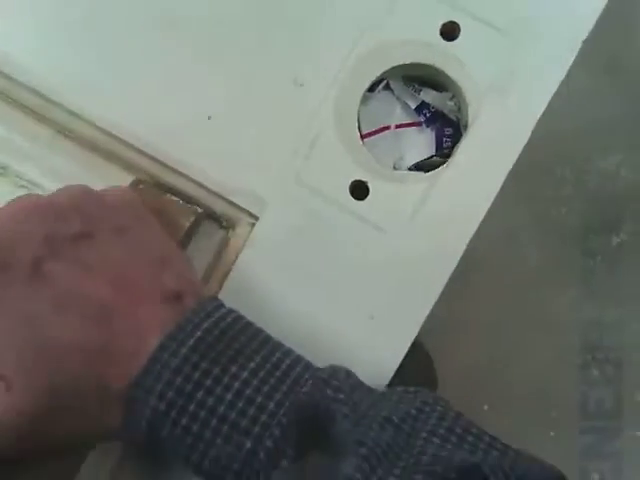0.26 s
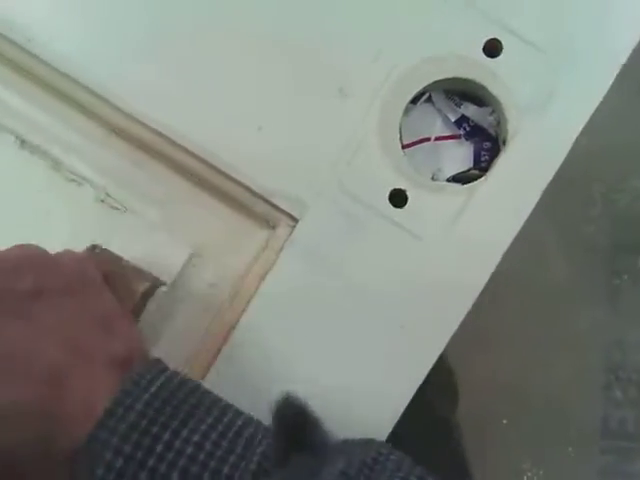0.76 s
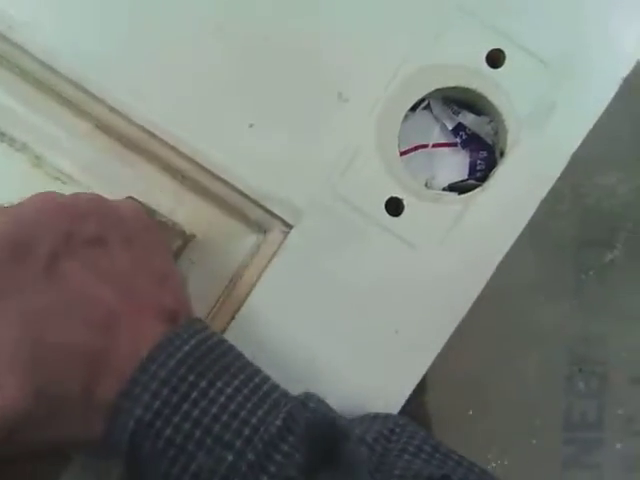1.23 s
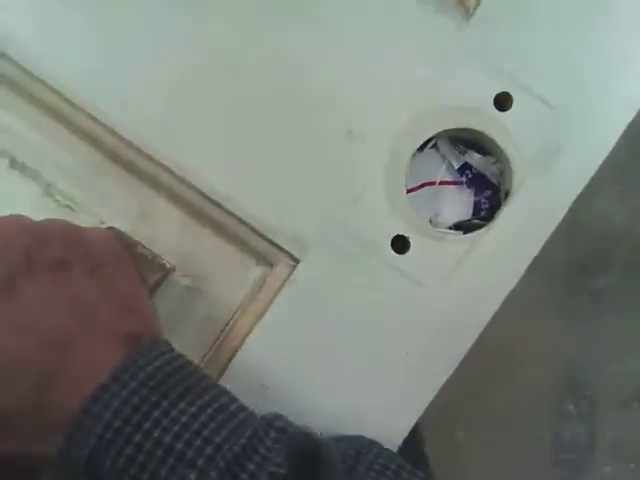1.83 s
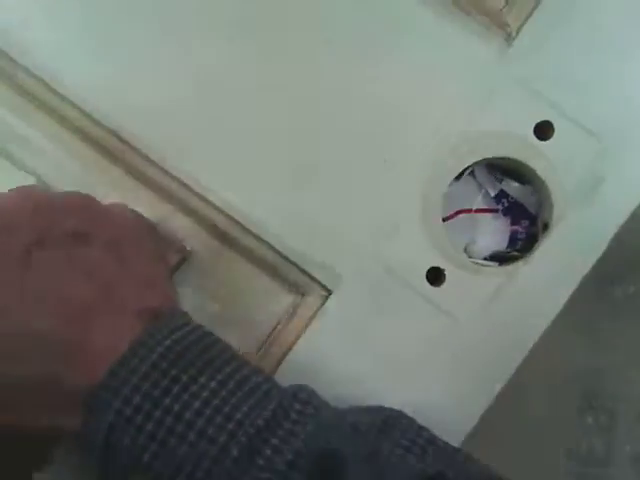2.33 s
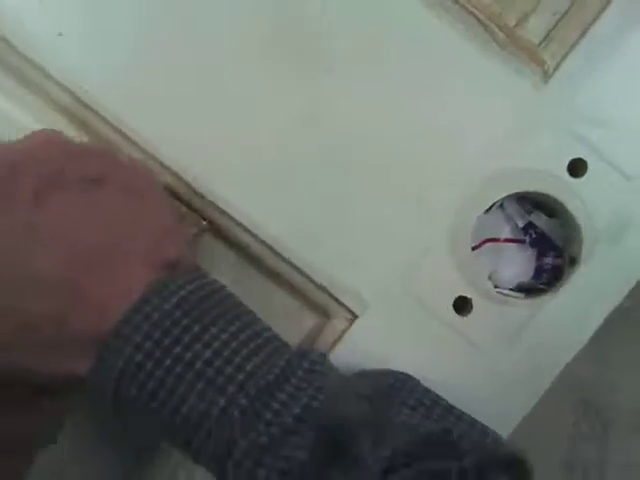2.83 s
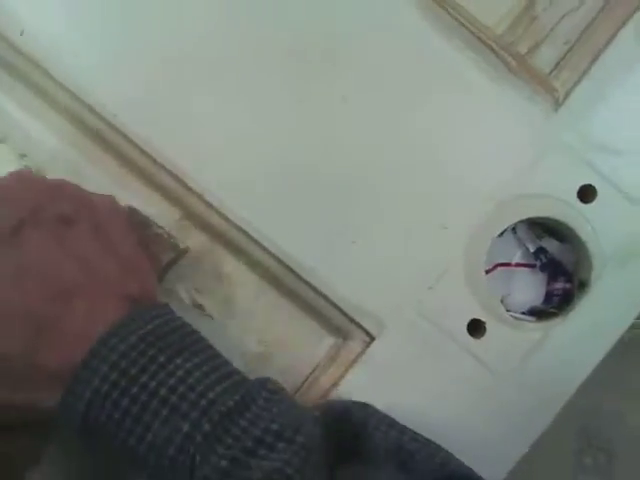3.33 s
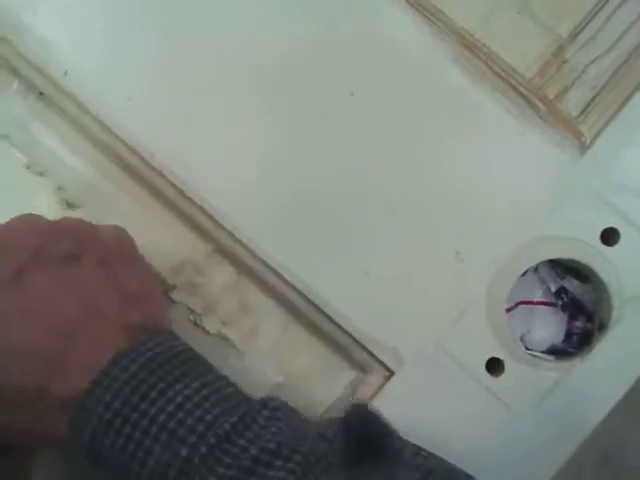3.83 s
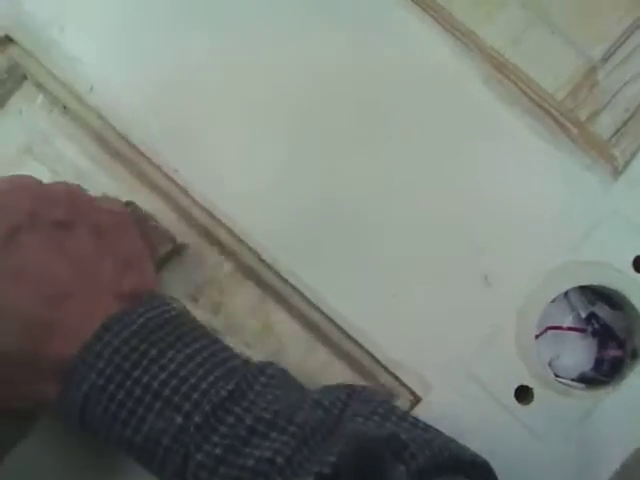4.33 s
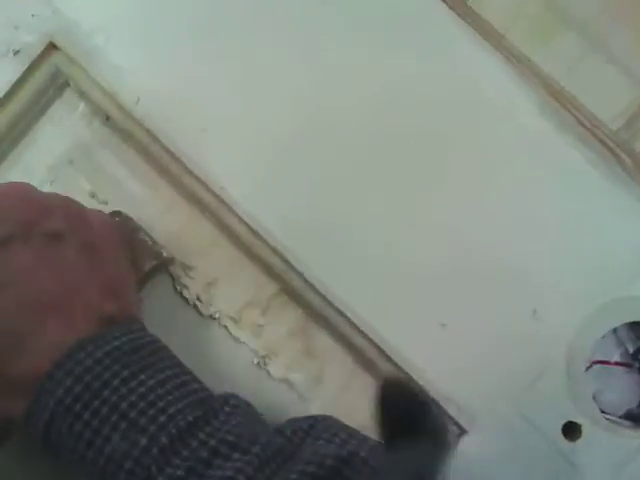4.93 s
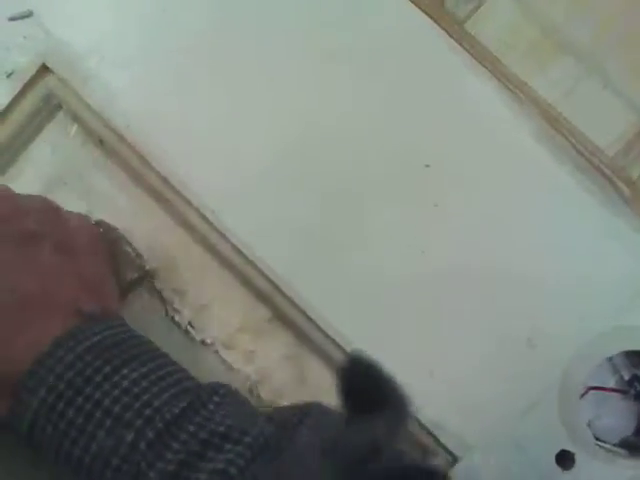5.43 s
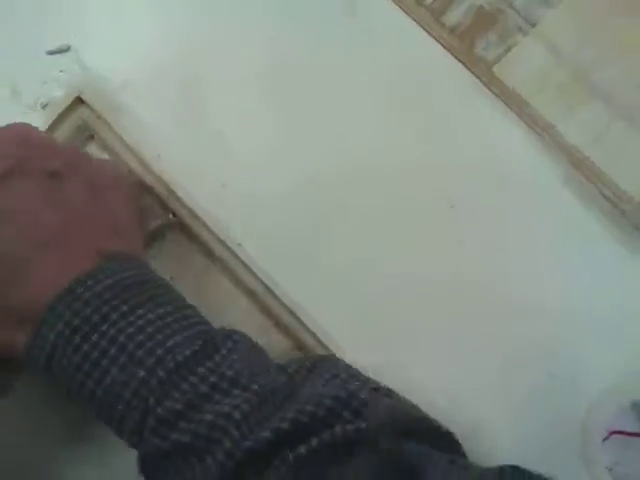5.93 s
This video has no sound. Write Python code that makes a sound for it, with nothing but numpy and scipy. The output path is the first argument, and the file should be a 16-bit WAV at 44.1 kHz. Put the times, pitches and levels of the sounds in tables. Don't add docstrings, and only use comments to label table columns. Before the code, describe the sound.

A hand scraper rasps old paint off a wooden door in short, even back-and-forth strokes, gritty and close, over a steady fan roar.

```python
import sys
import numpy as np
from scipy import signal
from scipy.fft import rfft, irfft, next_fast_len
from scipy.io import wavfile
from scipy.ndimage import uniform_filter1d

SR = 44100
rng = np.random.default_rng(int(sys.argv[2]) if len(sys.argv) > 2 else 0)


def master_out(mix):
    frames = np.transpose(np.atleast_2d(mix))
    ceiling = np.clip(frames, -1, 1)
    pcm = np.round(ceiling * 32767).astype(np.int16)
    wavfile.write(sys.argv[1], SR, pcm)


def voltage_ratio(level):
    return 10 ** (np.asarray(level, float) / 20)


N = 272097

# (peak time [s], rise [ms], fall [ms], level [dB], brightness [dB])
PUSH_STROKES = [(.178, 24, 20, -26.5, -3), (.635, 20, 30, -23.5, -2.5), (1.15, 25, 28, -37, -0.5),
                (1.5, 12, 40, -17.5, -4), (1.974, 22, 22, -16.5, -2), (2.392, 12, 24, -12, -1),
                (2.827, 48, 24, -21, -1.5), (3.212, 19, 32, -16, 1.5), (3.588, 16, 47, -24.5, 0.5),
                (4.022, 19, 30, -19, -3), (4.41, 28, 18, -19, -1.5), (4.783, 41, 23, -20, -0.5),
                (5.182, 22, 18, -16, 2.5), (5.578, 26, 18, -15.5, -0.5), (5.897, 27, 20, -21.5, -4),
                (6.168, 9.7, 17, -18, 0)]
# (peak time [s], rise [ms], fall [ms], level [dB], brightness [dB])
PULL_STROKES = [(.395, 24, 47, -34.5, -3.5), (.767, 39, 51, -27.5, -3), (.935, 17, 14, -31, -8.5),
                (1.426, 22, 28, -21.5, -4.5), (1.712, 10, 32, -31, 3.5), (2.265, 56, 24, -37, 2),
                (2.65, 25, 12, -25.5, -10), (3.03, 26, 22, -21.5, -5), (3.432, 21, 21, -28.5, -13.5),
                (3.818, 25, 23, -25, -6.5), (4.215, 34, 26, -29, 0), (4.606, 12, 25, -24, 1),
                (4.98, 15, 6.4, -22, -2), (5.372, 8.1, 18, -29, 3.5), (5.752, 28, 33, -22, -0.5),
                (5.972, 10, 12, -25.5, -2), (6.147, 18, 14, -20, -4)]
# (peak time [s], level [dB], brightness [dB], rasp [dB])
CATCHES = [(.146, -28.5, -2.5, 1.5), (.679, -37, 4.5, 0.5), (1.953, -19.5, 3, 2.5), (2.012, -32, 3, 5.5),
           (2.415, -16.5, -1, 1.5), (2.44, -27, -9.5, 0), (2.48, -33, -7, 5), (2.745, -37, 1.5, 4),
           (2.78, -28, -5.5, 6), (3.225, -22.5, -8, -2), (3.275, -34, 3.5, 3.5), (3.428, -31, -4, 6.5),
           (3.618, -25, -11.5, 3), (4.071, -33, 0.5, 2.5), (4.178, -28.5, -2.5, 2), (4.434, -25, 1, 6.5),
           (4.468, -31, -7, 12.5), (4.576, -26.5, -11, -1), (4.835, -29.5, -0.5, -1.5),
           (4.94, -30.5, -7.5, 2.5), (5.155, -23, -5, 4.5), (5.227, -29.5, 4.5, 2.5), (5.335, -31, 2.5, 3),
           (5.55, -23.5, -5.5, 2), (5.61, -30, -9.5, 10.5), (5.721, -28.5, 2, 7), (5.88, -29, -8.5, 5.5),
           (5.925, -33, -3, 8.5), (5.975, -32.5, 0, 10), (6.113, -34, 4.5, -4.5)]
# (time [s], rasp [dB])
PAINT_THICKNESS = [
    (0, 2.5),
    (1.5, -0.5),
    (2, 0.5),
    (3.2, 1.5),
    (3.6, 3.5),
    (4.1, 4),
    (4.8, 4),
    (5.6, -0.5),
    (6, 4.5),
]
# (time [s], level [dB])
GLIDE = [
    (0, -46),
    (.8, -46.5),
    (1.3, -45.5),
    (2.3, -54),
    (3, -38),
    (3.9, -45),
    (4.7, -41),
    (5.4, -34),
    (6.2, -52.5),
]
# (frequency [Hz], width [Hz], level [dB])
PANEL_MODES = [(574, 49, -4.5), (786, 170, -3), (901, 104.5, 1), (964, 130, -6.5)]
# (frequency [Hz], width [Hz], level [dB])
RASP_MODES = [(1242, 30, 0), (1370, 67, -8.5), (1020, 440, 0.5), (1786, 520, -3)]
# (frequency [Hz], width [Hz], level [dB])
EDGE_MODES = [(2130, 110, 12.5), (2440, 150, -3.5), (2700, 120, 12), (2730, 51, -18), (3280, 158, 3.5),
              (2700, 1900, 4.5)]
# (time [s], level [dB], panel pitch [Hz], ring [ms])
KNOCKS = [(1.228, -13.5, 637, 40), (1.494, -7, 1007, 25), (2.633, -6.5, 553, 53), (2.649, -4, 768, 26),
          (3.023, -5.5, 469, 70), (3.203, -2.5, 955, 61), (3.428, -14.5, 948, 36), (3.447, -16, 710, 31),
          (3.814, -9.5, 918, 18), (4.217, 9.5, 538, 10), (4.389, -4, 730, 39)]
# (time [s], level [dB], pitch [Hz], ring [ms])
THUDS = [
    (1.71, -12.5, 246, 45),
    (2.64, -21.5, 430, 17),
    (3.03, -12.5, 406, 64),
    (4.213, -7.5, 359, 50),
    (4.228, -12.5, 291, 76),
    (4.576, -13, 495, 62),
]
# (time [s], level [dB], blade pitch [Hz])
SNAPS = [(.143, -26.5, 2570), (.176, -20.5, 2540), (.392, -27.5, 2576), (.63, -28, 3130), (.93, -32, 2990),
         (1.425, -21.5, 2670), (1.706, -27, 3200), (1.962, -11.5, 2810), (2.382, -13.5, 3370),
         (2.411, -15, 2380), (3.027, -13, 2780), (3.583, -21, 2945), (4.016, -13.5, 2690),
         (4.208, -21, 2920), (4.411, -22, 3260), (4.603, -18, 3045), (4.785, -6.5, 2140),
         (5.184, -14.5, 2130), (5.365, -17.5, 2260), (5.575, -7, 2108), (5.576, -26, 3750),
         (5.75, -22.5, 3090), (5.897, -15.5, 2510), (5.968, -20, 2700), (6.144, -14, 2550)]
# (frequency [Hz], density [dB per Hz])
FAN_SPECTRUM = [(15, -47), (25, -13), (119, 1), (260, 1.5), (426, -3), (569, 0), (670, -2), (931, -4),
                (1460, -12.5), (2030, -15), (3400, -32.5), (4420, -60), (7480, -120)]
# (frequency [Hz], gain [dB])
INPUT_FILTER = [(3300, -0.5), (3500, -6.5), (3700, -18), (3850, -25), (4010, -36.5), (4500, -95.5)]
# (frequency [Hz], gain [dB])
SMOOTHING_FILTER = [(3000, -0.5), (3600, 3.5), (4010, 3), (4600, -6.5), (5000, -18), (5600, -33),
                    (6000, -53), (7100, -68.5), (7500, -75), (7900, -66.5), (8400, -76.5), (8800, -69),
                    (9500, -80.5), (15100, -77), (15700, -91)]

SLIPS_PER_S, SLIP_SCATTER_DB, CHATTER_DB = 1800, 2.7, 2.4
CATCH_RISE_MS, CATCH_FALL_MS = 18, 19
PULL_RASP_DB = -1
PANEL_LAG_MS, RASP_LAG_MS = 3.1, 4.3
GRIP_DB = 1.3
SNAP_RING_MS = 35
ROOM_T60_S, ROOM_DB = 0.24, -8
FAN_DB, HUM_HZ, HUM_DB = -22.5, 119.3, -34
SAMPLING_HZ, HAZE_DB = 8018, -89


def scraper():
    t = np.arange(N) / SR
    glide = voltage_ratio(np.interp(t, *np.transpose(GLIDE)) + 2.5 * walk(13))
    power = glide ** 2 * voltage_ratio([[0], [0], [-8]])
    bites = [(*row, np.interp(row[0], *np.transpose(PAINT_THICKNESS))) for row in PUSH_STROKES]
    bites += [(*row, PULL_RASP_DB) for row in PULL_STROKES]
    bites += [(s, CATCH_RISE_MS, CATCH_FALL_MS, *levels) for s, *levels in CATCHES]
    lag_ms = np.array([[PANEL_LAG_MS], [RASP_LAG_MS], [0]])
    for s, rise_ms, fall_ms, db, bright_db, rasp_db in bites:
        near = slice(max(int((s - .4) * SR), 0), int((s + .4) * SR))
        late_ms = 1000 * (t[near] - s) - lag_ms
        away = late_ms / np.where(late_ms < 0, rise_ms, fall_ms)
        fade_db = 8.66 * np.abs(away) ** np.where(away < 0, 1.8, 1.2)
        part_db = db + np.array([[-bright_db], [rasp_db], [bright_db]])
        power[:, near] += voltage_ratio(part_db - fade_db) ** 2
    shared = slips()
    bodies = [(PANEL_MODES, 520), (RASP_MODES, 1000), (EDGE_MODES, 2000)]
    out = 0
    for body_power, (modes, low_hz) in zip(power, bodies):
        clicks = 0.85 * shared + 0.94 * slips()
        out = out + ring(np.sqrt(body_power) * clicks, modes, low_hz)
    return out


def slips():
    chance = rng.random(N) < SLIPS_PER_S / SR
    scatter = np.minimum(rng.exponential(size=N), 2)
    size = rng.standard_normal(N) * voltage_ratio(SLIP_SCATTER_DB * scatter)
    chatter = np.clip(walk(120), -2, 2)
    return unit(chance * size * voltage_ratio(CHATTER_DB * chatter))


def ring(x, modes, low_hz):
    out, power = 0, 0
    for k, (hz, width, db) in enumerate(modes):
        drive = x * voltage_ratio(db + GRIP_DB * walk(30))
        out = out + (-1) ** k * signal.lfilter(*signal.iirpeak(hz, hz / width, SR), drive)
        power += voltage_ratio(db) ** 2 * np.pi * width / SR
    return colour(out / np.sqrt(power), [(low_hz / 2, -13), (low_hz, 0)])


def knocks():
    wood = blows([*KNOCKS, *THUDS], [(1.6, 0.82), (.68, 0.45)], .002) * voltage_ratio(-3)
    snaps = [(*row, SNAP_RING_MS) for row in SNAPS]
    steel = blows(snaps, [(0.92, 0.49), (1.3, 0.15)], 0.0012) * voltage_ratio(1.5)
    return wood + steel


def blows(table, partners, onset_s):
    out = np.zeros(N + SR)
    t = np.arange(SR // 5) / SR
    onset = np.minimum(t / onset_s, 1)
    for s, db, hz, ring_ms in table:
        modes = sum(gain * np.sin(2 * np.pi * ratio * hz * t) for ratio, gain in [(1, 1), *partners])
        decay = voltage_ratio(db - 60000 * t / ring_ms)
        out[int(s * SR):][:len(t)] += decay * modes * onset
    return out[:N]


def room(x):
    t = np.arange(SR // 2) / SR
    tail = rng.standard_normal(len(t)) * voltage_ratio(-60 * t / ROOM_T60_S) * (t > .006)
    wet = signal.fftconvolve(x, tail / np.linalg.norm(tail))[:N]
    return voltage_ratio(ROOM_DB) * colour(wet, [(1000, 3.5), (3500, -6)])


def fan():
    spectrum = [*FAN_SPECTRUM[:-2], (4100, -38)]
    roar = voltage_ratio(FAN_DB) * unit(colour(rng.standard_normal(N), spectrum))
    bass = colour(roar, [(300, 6), (600, -35)])
    roar = bass * voltage_ratio(.4 * walk(5)) + (roar - bass) * voltage_ratio(.7 * walk(6))
    hum_hz = HUM_HZ + 9 * walk(14)
    hum = np.sin(2 * np.pi * np.cumsum(hum_hz) / SR) * voltage_ratio(HUM_DB + 2 * walk(15.0))
    return roar + hum


def walk(rate):
    k = int(SR / rate)
    held = np.repeat(rng.standard_normal(N // k + 1), k)
    return unit(uniform_filter1d(uniform_filter1d(held, k), k)[:N])


def colour(x, points):
    size = next_fast_len(N + 4096)
    hz, db = np.transpose(points)
    log_hz = np.log(np.fft.rfftfreq(size, 1 / SR) + 1)
    gain = voltage_ratio(np.interp(log_hz, np.log(hz), db))
    return irfft(rfft(x, size) * gain, size)[:N]


def unit(x):
    return x / np.sqrt(np.mean(x ** 2))


def scene():
    blade = scraper() + knocks()
    return (blade + room(blade) + fan())[None]


def roll_off(x):
    return signal.sosfilt(signal.butter(12, 15700, fs=SR, output="sos"), x)


def record(dry):
    x = colour(np.tanh(1.095 * dry[0]) / 1.062, INPUT_FILTER)
    clock = 2 * np.pi * SAMPLING_HZ * np.arange(N) / SR
    x = colour(x * (1 + 2 * np.cos(clock) + 2 * np.cos(2 * clock)), SMOOTHING_FILTER)
    x += voltage_ratio(HAZE_DB) * unit(x) * rng.standard_normal(N)
    mix = x[None] - .0012
    return roll_off(mix)


dry = scene()
out = record(dry)
master_out(out)
```